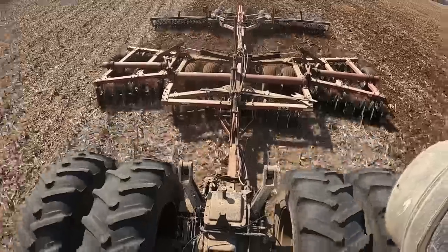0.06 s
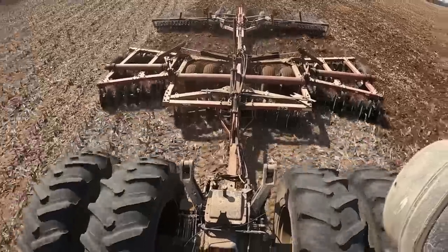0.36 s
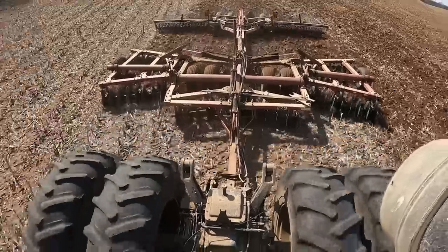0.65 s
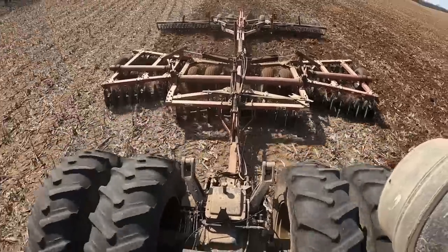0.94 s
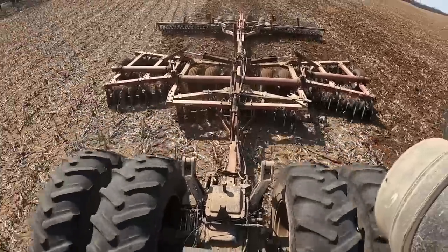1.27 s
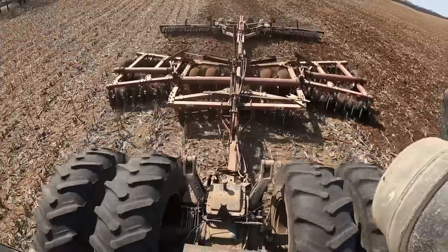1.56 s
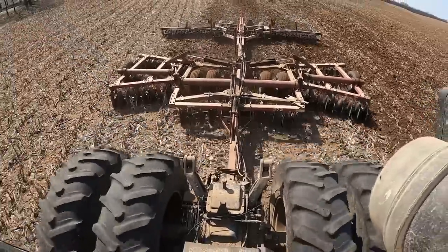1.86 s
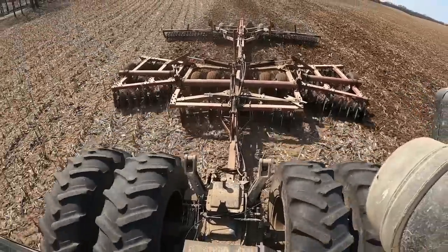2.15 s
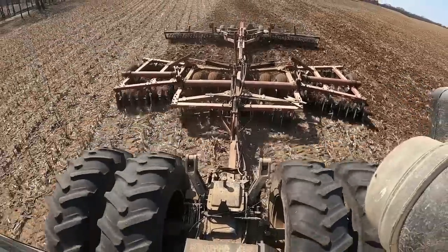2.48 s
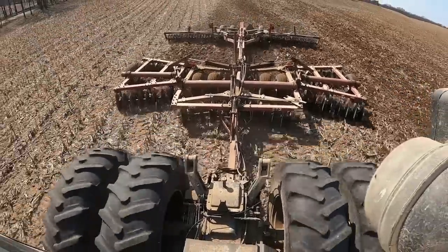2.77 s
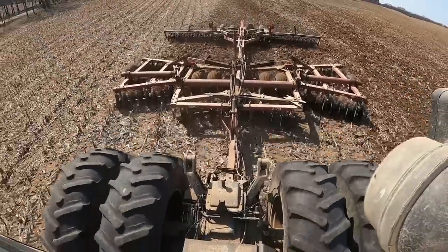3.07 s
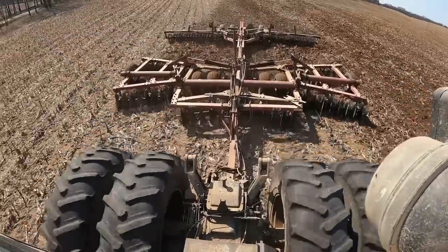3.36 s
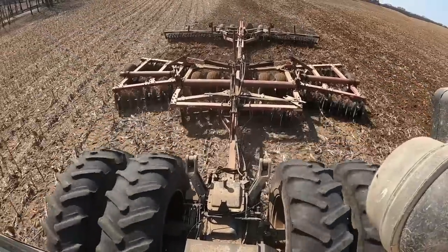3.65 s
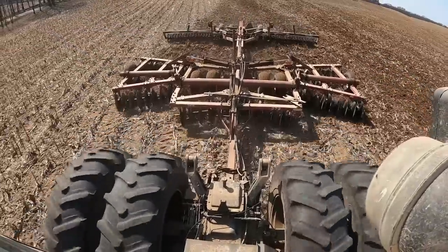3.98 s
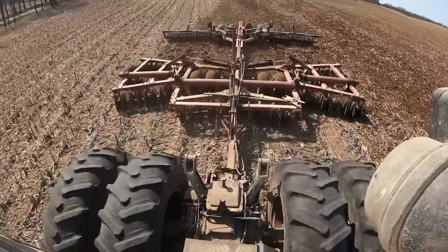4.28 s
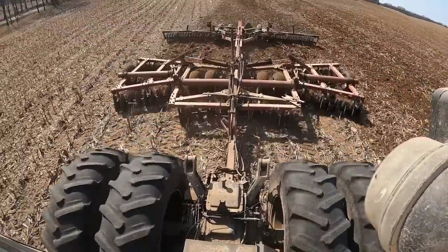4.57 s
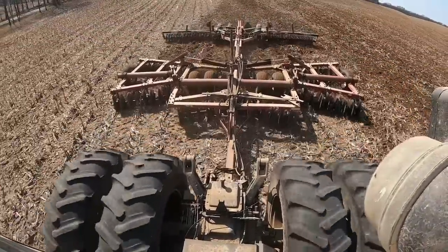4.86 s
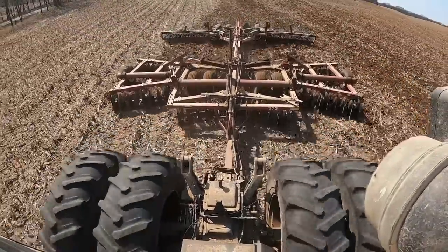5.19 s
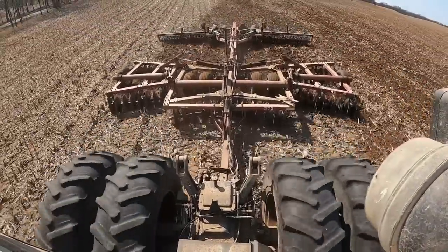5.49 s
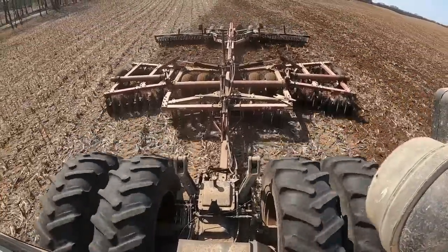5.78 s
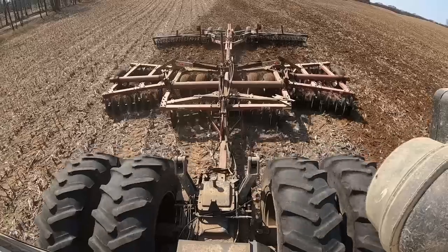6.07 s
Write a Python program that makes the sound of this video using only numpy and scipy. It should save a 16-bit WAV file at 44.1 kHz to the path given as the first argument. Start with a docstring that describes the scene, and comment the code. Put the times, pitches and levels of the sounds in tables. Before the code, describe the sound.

A large diesel tractor runs at a steady high speed, heard from the back of its cab in a field. The deep drone carries a fast engine clatter, thin gear whine and low chassis rumble. Behind it, a disc harrow hisses faintly through soil and snaps dry stalks. About two seconds in, the steel discs squeak briefly and strike a stone; a few more short squeaks follow while the engine carries on unchanged.

```python
"""A deep, steady diesel drone, heard from the back of a tractor's cab as it pulls a disc harrow.
The six-cylinder engine runs at full governed speed and knocks once per firing; the gears whine
and the chassis rumbles over the ground. Behind, the harrow's steel discs hiss through soil and
dry stubble, squeak now and then and strike a stone."""
import sys
import numpy as np
from scipy import signal
from scipy.fft import rfft, irfft
from scipy.io import wavfile

SR = 44100
rng = np.random.default_rng(int(sys.argv[2]) if len(sys.argv) > 2 else 0)


def persist_wave(psi):
    """Save psi, clipped to +-1, as 16-bit WAV."""
    counts = np.round(np.clip(psi, -1, 1) * 32767).astype(np.int16)
    wavfile.write(sys.argv[1], SR, np.atleast_2d(counts).T)


N = 274743
TIME = np.arange(N) / SR
BINS = np.maximum(np.arange(N // 2 + 1) * SR / N, 1)  # f/Hz

# tones of the drone: multiple of the engine's cycle rate, relative level/dB
DRONE_TONES = [(1, -32), (2, -13), (3, -28), (4, -2), (5, -10), (6, -1), (7, -9.5), (8, 1), (9, -19),
               (10, -16.5), (11, -21), (12, -17.5), (13, -13.5), (14, -41), (15, -16.5), (16, -12.5),
               (17, -22), (18, -22), (19, -17), (20, -29), (21, -21), (22, -22.5), (23, -23.5), (24, -24),
               (25, -21.5), (26, -24), (27, -22), (28, -42), (29, -28.5), (30, -23)]

def drone(cycles, shimmer_db, wobble, smear):
    """Exhaust and cab boom. Firing gives every sixth tone; unequal cylinders fill in the rest."""
    out = np.zeros(N)
    for multiple, db in DRONE_TONES:
        # silencer and cab delay each tone differently, smearing the pulses into an even hum
        turns = multiple * cycles + smear * multiple ** 2
        gain = from_db(db + shimmer_db * drift(1.1))
        out += gain * np.sin(2 * np.pi * turns + wobble * drift(0.49))
    return rms_one(out)


# tone colour of the rumble: f/Hz, level/dB per Hz
RUMBLE_SPECTRUM = [(10, -60), (24, -47), (50, -49), (100, -51), (130, -44), (150, -48.5), (175, -52.5),
                   (245, -52), (275, -59.5), (320, -50.5), (370, -57.5), (500, -57.5)]
# bumps under the tyres: middle t/s, length/s, rise/dB
GROUND_BUMPS = [(.2, .35, 0), (1.1, .35, 5.5), (1.9, 0.36, 0), (4.48, 0.69, 6.5)]

def chassis(smooth_db, jolt_top_hz, level_db):
    """Tyres and frame rumble; bumps swell the deepest part."""
    rumble = from_db(level_db) * colour(rng.standard_normal(N), RUMBLE_SPECTRUM)
    deep = signal.sosfiltfilt(signal.butter(2, jolt_top_hz, fs=SR, output="sos"), rumble)
    return rumble + deep * (from_db(smooth_db + humps(GROUND_BUMPS)) - 1)


# tone colour of the engine block and panels: f/Hz, level/dB per Hz
CLATTER_SPECTRUM = [(550, -60.5), (730, -60), (820, -57.5), (870, -60.5), (950, -59), (1150, -61.5),
                    (1230, -64.5), (1450, -63.5), (1580, -67.5), (2600, -68.5), (2830, -70), (2980, -70.5),
                    (3550, -70.5), (4200, -77)]

def clatter(cycles, knock_db, rattle_db, throb, throb_top_hz, flutter_db):
    """Knock and loose rattle ring through block and panels; the low part throbs with the crankshaft."""
    crank = 4 * np.pi * cycles
    beat = .8 * np.cos(crank) + np.cos(2 * crank) + .7 * np.cos(3 * crank)
    rattle = from_db(rattle_db + flutter_db * drift(15)) * rng.standard_normal(N)
    knocks = from_db(knock_db) * knock(cycles, ring_share=0.79, scatter_db=3.0)
    body = colour(rattle + knocks, CLATTER_SPECTRUM)
    low = signal.sosfiltfilt(signal.butter(2, throb_top_hz, fs=SR, output="sos"), body)
    return body + throb * beat * low


def knock(cycles, ring_share, scatter_db):
    """Each of six cylinders raps the engine block in its own way; only the strength varies."""
    position = np.arange(2048) / 2048  # through one cycle
    raps = rng.standard_normal(len(position)) * np.exp(-(6 * position % 1) / ring_share)
    firing = (6 * cycles).astype(int)
    strength = from_db(scatter_db * rng.standard_normal(firing[-1] + 1))
    return rms_one(np.interp(cycles, position, raps, period=1) * strength[firing])


# gears, pump and fan at average speed: f/Hz, level/dB
WHINE_TONES = [(262, -42), (323, -32.5), (621, -45.5), (641, -47), (706, -47), (796, -47.5), (834, -45.5),
               (969, -44), (1087, -47), (1243, -56), (1292, -48), (1863, -49), (2794, -50.5), (2835, -52.5)]
# swells of the loudest whine: middle t/s, length/s, rise/dB
WHINE_SWELLS = [(.62, .2, 3), (5.33, 0.33, 6), (5.92, 0.46, 4.5)]

def whines(rpm, shimmer_db, wobble, unsteady_hz):
    """Gear teeth and blades follow the engine and waver as the load shifts, the high tones most."""
    turned = np.cumsum(rpm / rpm.mean()) / SR
    loudest_db = max(db for hz, db in WHINE_TONES)
    out = np.zeros(N)
    for hz, db in WHINE_TONES:
        unsteady = 1 + hz / unsteady_hz
        phase = 2 * np.pi * (hz * turned + rng.random()) + unsteady * wobble * drift(2.8)
        shimmer = from_db(unsteady * shimmer_db * drift(3.6))
        swell_db = humps(WHINE_SWELLS) if db == loudest_db else 0
        out += from_db(db + swell_db) * rms_one(shimmer * np.sin(phase))
    return out


# stones hitting the harrow: t/s, level/dB, lowest f/Hz, highest f/Hz, fade time/s
STONE_HITS = [(2.094, -36, 1200, 3100, .06), (2.516, -22, 300, 2300, .07), (2.532, -25, 280, 1400, .094),
              (3.19, -40, 3500, 4670, .25), (3.324, -33, 3500, 4700, .06)]

def stones():
    """A stone sets the steel ringing at many pitches at once; the earth soon stills it."""
    out = np.zeros(N)
    for start, db, low, high, fade_s in STONE_HITS:
        band = signal.butter(4, [low, high], "band", fs=SR, output="sos")
        ring = signal.sosfilt(band, burst(start, fade_s) + 1e-18)
        out += from_db(db) * np.sqrt(SR / 2 / (high - low)) * ring
    return out


# discs rubbing on their scrapers: t/s, length/s, f/Hz, peak level/dB
DISC_SQUEAKS = [(1.992, 0.024, 2820, -25.5), (2.034, .029, 2840, -29.5), (2.087, .019, 3030, -31.5),
                (2.089, .036, 2620, -31.5), (3.172, .056, 2160, -29), (3.328, 0.028, 2350, -30.5),
                (3.842, .026, 4240, -41), (4.42, .035, 2820, -36.5)]

def squeaks(waver, octave_db):
    """Steel sticks and slips on steel: a short unsteady tone with a faint octave above."""
    out = np.zeros(N)
    for start, length, hz, db in DISC_SQUEAKS:
        progress = np.clip((TIME - start) / length, 0, 1)
        gain = from_db(db) * np.sqrt(np.abs(np.sin(np.pi * progress)))
        phase = 2 * np.pi * np.cumsum(hz * (1 + waver * drift(148))) / SR
        out += gain * (np.sin(phase) + from_db(octave_db) * np.sin(2 * phase))
    return out


# tone colour of soil and stalks: f/Hz, level/dB per Hz
SOIL_SPECTRUM = [(4200, -81.5), (5200, -85.5), (6900, -88.5), (8000, -93.5), (10000, -91.5), (11400, -99),
                 (12300, -90.5), (13200, -94), (14300, -100.8), (15600, -104.9)]
# the hiss as the discs bite deeper or ride up: t/s, relative level/dB
DISC_BITE = [(0.05, -48.5), (0.3, -50), (1.0, -50), (2.0, -48), (2.75, -50.5), (3.62, -48.5), (4.06, -51),
             (5.01, -50.5), (5.59, -50.5), (5.86, -48.5), (6.15, -50.5)]

def soil(bite_db, crumbs_per_s, crumb_db, slide_db, clump_db):
    """Earth slides over the discs, and crumbs patter down in clumps."""
    sizes = from_db(4.2 * np.minimum(rng.exponential(1, N), 4)) * rng.choice([-1, 1], N)
    lands = rng.random(N) < crumbs_per_s * from_db(clump_db * drift(12)) / SR
    flow = from_db(slide_db) * rng.standard_normal(N) + from_db(crumb_db) * rms_one(sizes * lands)
    flicker = from_db(.5 * drift(13.0))
    return colour(flow * swing(bite_db, share=1.0) * flicker, SOIL_SPECTRUM)


# stalks breaking: t/s, relative level/dB
STALK_SNAPS = [(0.3616, -36), (0.9467, -36), (1.3344, -40), (1.4312, -40), (1.5219, -40), (2.2707, -33.5),
               (2.3531, -38), (3.7549, -39), (4.8449, -36), (4.9307, -41), (5.6394, -37), (6.1265, -39)]

def stalks(crack_db, crack_s, splinter_db, splinter_s):
    """A dry stalk breaks with a sharp crack and a short splintering."""
    breaks = np.zeros(N)
    for start, db in STALK_SNAPS:
        breaks += from_db(db + crack_db) * burst(start, crack_s)
        breaks += from_db(db + splinter_db) * burst(start, splinter_s)
    return colour(breaks, SOIL_SPECTRUM)


def from_db(db):
    """Decibels to gain."""
    return 10 ** (np.asarray(db) / 20)


def rms_one(x):
    """Scale to an average strength (rms) of 1."""
    return x / np.sqrt(np.mean(x ** 2) + 1e-20)


def in_time(rows):
    """Each column of a curve, at every sample."""
    s, *columns = np.transpose(rows)
    return [np.interp(TIME, s, c) for c in columns]


def swing(level_db, share):
    """Gain that follows a share of a level's ups and downs."""
    return from_db(share * (level_db - level_db.mean()))


def drift(rate):
    """Smooth random wandering with a spread of 1."""
    r = np.exp(-80 * np.pi * rate / SR)
    slow = signal.lfilter([1], [1, -2 * r, r * r], rng.standard_normal(N // 40 + 2002))[2000:]
    return np.interp(np.arange(N) / 40, np.arange(len(slow)), rms_one(slow))


def colour(white, spectrum):
    """Give plain noise a tone colour that falls steeply beyond the table's ends."""
    hz, db = np.transpose(spectrum)
    skirts = np.sqrt((1 + (hz[0] / BINS) ** 12) * (1 + (BINS / hz[-1]) ** 12))
    gain = from_db(np.interp(np.log(BINS), np.log(hz), db)) / skirts
    return irfft(rfft(white) * gain * np.sqrt(SR / 2), N)


def burst(start, t60):
    """Noise that starts at once and fades by 60 dB in t60 seconds."""
    age = TIME - start
    return rng.standard_normal(N) * (age >= 0) * from_db(-60 * np.clip(age / t60, 0, 2))


def humps(rows):
    """Add up smooth rises and falls, each with its middle, length and height."""
    return sum(height * np.cos(np.pi * np.clip((TIME - middle) / length, -.5, .5)) ** 2
               for middle, length, height in rows)


# heavy soil slows the engine until its speed governor catches up: middle t/s, length/s, drop/rpm
SPEED_SAGS = [(1.22, 0.896, 12.08), (4.2, 0.449, 18.12), (5.05, 1.319, 11.9)]

def scene():
    """Tractor in front, harrow behind; the drag of the soil sets the engine's speed and effort."""
    sag_rpm = humps(SPEED_SAGS)
    rpm = 2333.6 - sag_rpm + 2.5 * drift(2.07)  # the governor never quite settles
    cycles = np.cumsum(rpm / 120) / SR  # one engine cycle is two turns of the crankshaft
    bite_db, = in_time(DISC_BITE)
    # a slowed engine gets more fuel and booms, while its slower parts clatter less
    boom = from_db(-18.65 + 0.014 * sag_rpm)
    shaking = swing(-0.0258 * sag_rpm + .35 * bite_db, share=0.69)
    tractor = boom * drone(cycles, shimmer_db=.5, wobble=0.035, smear=.172)
    tractor += shaking * clatter(cycles, knock_db=-12.5, rattle_db=-0.36, throb=0.14,
                                 throb_top_hz=1500, flutter_db=0.62)
    tractor += whines(rpm, shimmer_db=1.55, wobble=0.29, unsteady_hz=1800)
    tractor += chassis(smooth_db=-2.2, jolt_top_hz=168, level_db=0.3)
    harrow = soil(bite_db, crumbs_per_s=700, crumb_db=-7.5, slide_db=-1, clump_db=4.5)
    harrow += stalks(crack_db=52.5, crack_s=0.0025, splinter_db=43, splinter_s=0.056)
    harrow += squeaks(waver=0.01094, octave_db=-25) + stones()
    return (tractor + harrow)[None]


def record(dry):
    """Treble above 15700 Hz is cut steeply."""
    return signal.sosfilt(signal.ellip(12, .1, 90, 15700, fs=SR, output="sos"), dry)


dry = scene()
out = record(dry)
persist_wave(out)
```